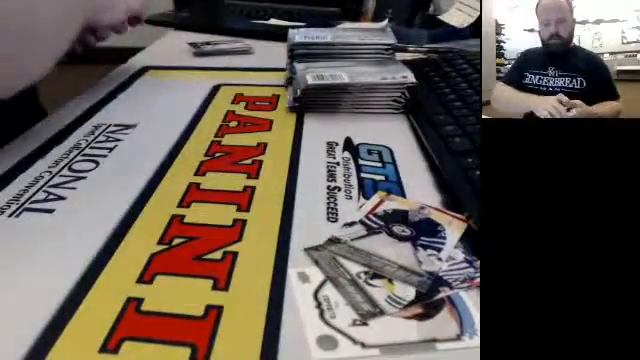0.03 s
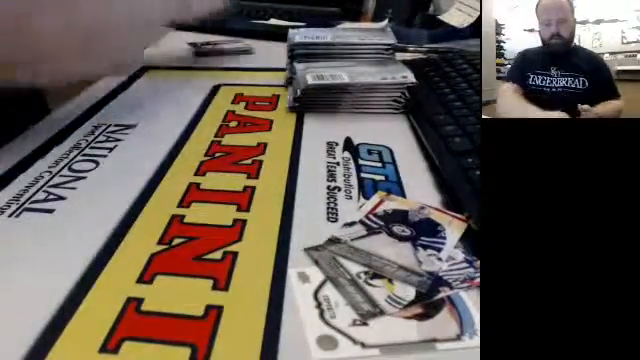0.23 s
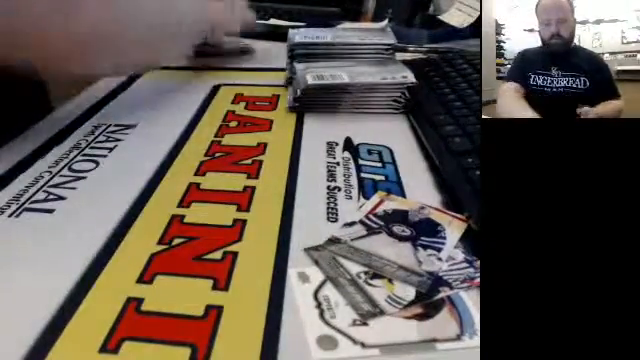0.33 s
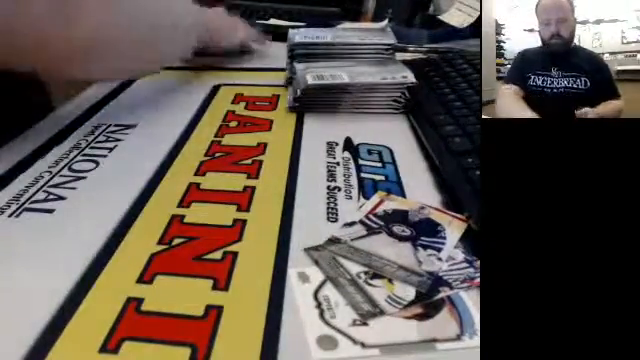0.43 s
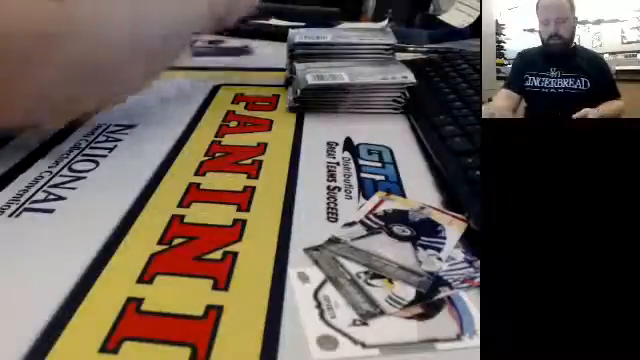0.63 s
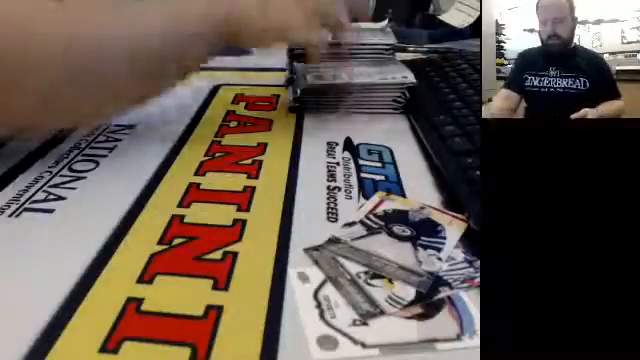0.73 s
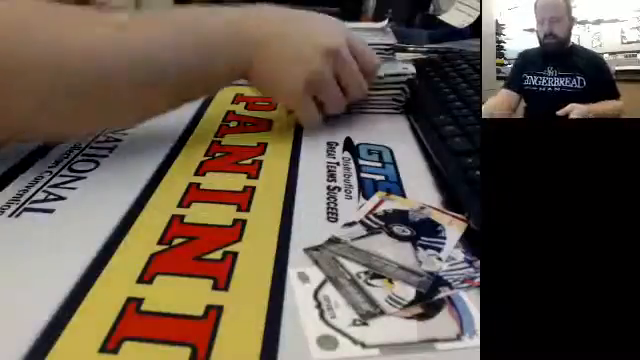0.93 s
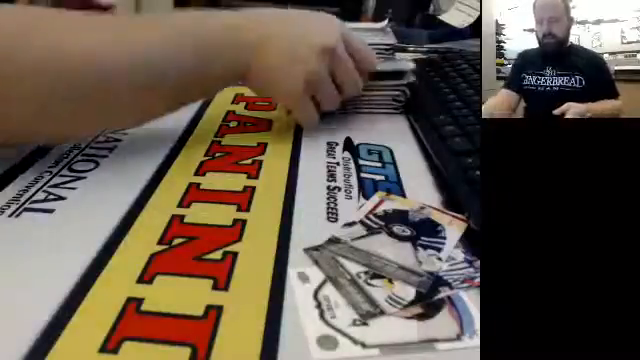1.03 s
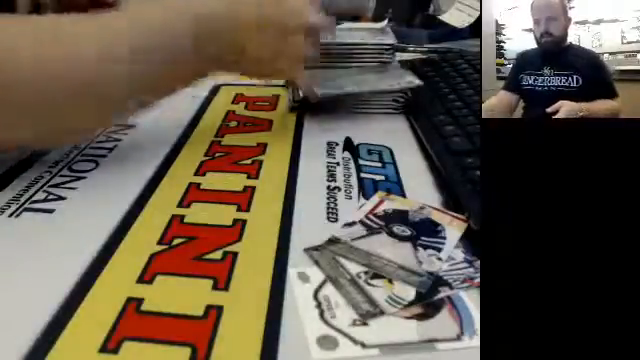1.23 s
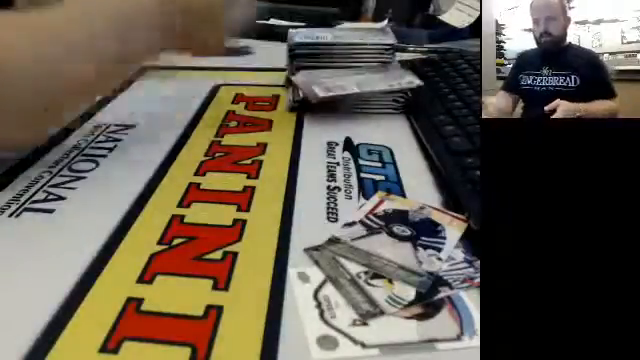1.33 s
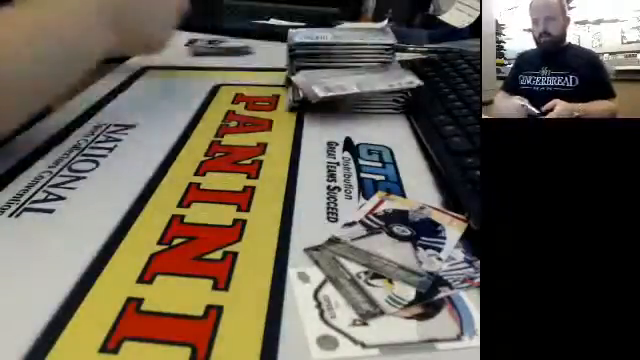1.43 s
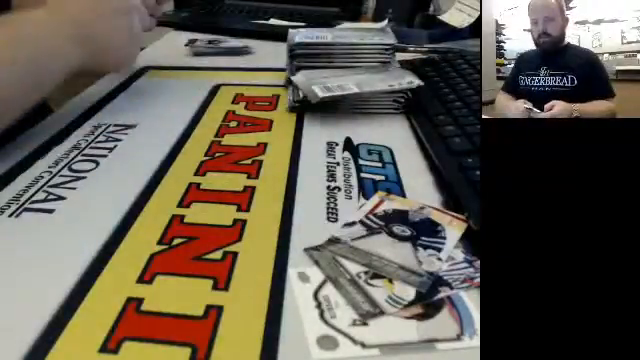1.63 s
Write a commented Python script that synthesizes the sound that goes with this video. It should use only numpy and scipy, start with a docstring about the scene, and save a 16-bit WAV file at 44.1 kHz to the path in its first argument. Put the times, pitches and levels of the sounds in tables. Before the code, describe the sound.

A hard object knocks on a tabletop before a hand takes a crinkling foil pack.

```python
"""A hard object set down on a table: one sharp knock that cracks, pings and rings the top in a small room.
Light plastic clicks come before it. Then a hand takes a foil card pack off a stack, with soft bumps:
the wrapper rustles, buckles in snaps, slides and starts to crinkle.
Mains hum and faint hiss underneath; the desk microphone is dull above 8 kHz."""
import sys
import numpy as np
from scipy import signal
from scipy.fft import rfft, irfft, next_fast_len
from scipy.io import wavfile

SR = 44100
rng = np.random.default_rng(int(sys.argv[2]) if len(sys.argv) > 2 else 0)


def waveform_to_disk(signal):
    """Save audio, clipped to [-1, 1], as 16-bit WAV at the path in sys.argv[1]."""
    frames = np.transpose(np.atleast_2d(signal))
    scaled = np.clip(frames, -1, 1) * 32767
    samples = np.round(scaled).astype(np.int16)
    wavfile.write(sys.argv[1], SR, samples)


N = 74970
T = np.arange(N) / SR
FFT_SIZE = next_fast_len(N + SR // 2, real=True) // 2 * 2
HZ = np.fft.rfftfreq(FFT_SIZE, 1 / SR)

# room noise (frequency [Hz], gain [dB])
NOISE_EQ = [(25, -16.5), (60, -9), (100, -2.5), (165, 5), (230, -5), (400, -10), (600, -13.5), (1000, -15),
            (2000, -22.5), (4000, -30.5), (8400, -34), (9500, -15), (15000, -16.5)]
# room tail (frequency [Hz], level [dB], t60 [s], start of suppression [s])
ROOM_BANDS = [(90, -12.5, .35, .3), (174, -4.5, 0.65, 0.48), (290, -2, 0.88, 0.29), (700, -11, 0.93, 0.31),
              (1500, -12.5, .62, .23), (2694, -11, 0.59, 0.25), (4840, -10.5, 0.65, .17),
              (7160, -10, 0.17, .12)]
# hand and stack bumps (time [s], level [dB], frequency [Hz], t60 [s])
BUMP_HITS = [(0.182, -53.5, 1430, 0.045), (.181, -53.5, 2255, 0.062), (0.495, -43, 259, 0.073),
             (0.656, -55, 275.9, 0.09), (1.0289, -53.5, 1338, 0.055), (1.404, -69.5, 562.6, 0.17),
             (1.509, -62.5, 690, 0.053), (1.511, -60, 1203, 0.028)]
# foil on foil (time [s], length [s], level [dB])
SLIDE_STROKES = [(0.85, 0.16, -77), (1.11, 0.046, -83), (1.39, 0.041, -77), (1.457, .14, -68.5)]
# sliding hiss (frequency [Hz], gain [dB])
SLIDE_EQ = [(1000, -32), (4500, -14), (5800, -0.5), (6800, 5.5), (7600, -4), (9000, -14)]
# rustle envelope (time [s], level [dB])
RUSTLE_ENVELOPE = [(.675, -100), (.695, -65.5), (.735, -63.5), (.775, -67), (.805, -68), (.86, -77),
                   (.95, -80.5), (1.0, -65.5), (1.045, -73), (1.075, -93.5), (1.38, -111), (1.6, -91.5),
                   (1.63, -71), (1.66, -74), (1.7, -43.5)]
# foil snaps (time [s], level [dB], facet frequency [Hz], relative facet level [dB], t60 [s])
FOIL_SNAPS = [(0.6853, -57, 6260, 3, 0.011), (0.694, -61.5, 6300, -12, 0.022),
              (0.7131, -43.5, 1882, -11, .012), (0.731, -38.5, 1930, -8.5, 0.016),
              (0.7544, -51, 3700, -6, 0.042), (.765, -64, 3600, -16, 0.017),
              (0.7875, -36.5, 4940, -16.5, 0.039), (0.7986, -42.5, 2950, -9, 0.015),
              (.834, -60.5, 5080, 2.5, 0.046), (0.876, -41, 3500, -12, .012),
              (0.934, -58.5, 3300, -6.5, 0.014), (0.976, -43.5, 2400, -1.5, 0.012),
              (1.0004, -29, 4850, -13.5, 0.0035), (1.017, -54, 6700, 0, 0.013),
              (1.0291, -40.5, 4010, -24, 0.045), (1.397, -53, 6760, 3.5, 0.038),
              (1.399, -54, 3070, -2, 0.018), (1.404, -40, 3890, -9.5, 0.026),
              (1.616, -53.5, 2600, -3, 0.03), (1.6485, -39.5, 6400, -2, 0.022),
              (1.667, -27.5, 2227, -14.5, 0.014), (1.683, -32, 1880, -14, 0.061),
              (1.6948, -30.5, 6450, 2.5, 0.0066), (1.696, -33.5, 1115, -2.5, 0.022)]
# foil timbre (frequency [Hz], gain [dB])
FOIL_EQ = [(300, -23.5), (1000, -11.5), (1550, -11.5), (2000, -3), (3200, -1.5), (5000, -3.5), (7000, 0.5),
           (8200, -10), (10000, -19)]
# plastic clicks (time [s], level [dB], relative edge level [dB])
CLICK_HITS = [(0.0488, -38.5, -1), (0.0538, -18, -16), (0.056, -24, -16), (.063, -22.5, -7.5),
              (0.067, -26, -7), (.074, -33.5, -8), (0.0817, -27, -16.5), (0.088, -35, -21.5)]
# click body (frequency [Hz], gain [dB])
PLASTIC_EQ = [(400, -32.5), (850, -20.5), (1100, -2), (1600, 3.5), (2400, -3.5), (3300, -16), (5000, -35.5),
              (8000, -49)]
# bright click edge (frequency [Hz], gain [dB])
EDGE_EQ = [(1500, -36.5), (4200, -7.5), (6000, -16), (7200, -26), (8200, -40.5)]
# edge touches, weight lands, object settles (time [s], table ring [dB], crack [dB], ping [dB])
KNOCK_HITS = [(0.2429, -30, -15, -18.5), (.2476, -2.5, 4, -26.5), (.2542, -26, -21.5, -27)]
# table top modes (frequency [Hz], level [dB], t60 [s])
TABLE_MODES = [(93.4, -36, 0.12), (223.4, -22.5, 0.07635), (374.4, -19.5, 0.13), (650.4, -16.5, 0.062),
               (854.3, -8.5, 0.032), (910, -20.5, .03), (1152, -8, 0.021), (1385, -17, .03),
               (1560, -8.5, 0.018), (2290, -30, 0.017), (2516, -24, 0.046), (2705, -27, .04)]
# contact crack (frequency [Hz], gain [dB])
CRACK_EQ = [(400, -34.5), (1000, -19.5), (1800, 1), (3000, 4), (4500, -4.5), (6000, -5), (7600, -7.5),
            (9000, -12.5)]
# direct radiation of the knock (frequency [Hz], gain [dB])
RADIATION_EQ = [(45, -38.5), (68, -31), (92, -7.5), (125, -14), (160, -21.5), (195, -4.5), (3000, 1),
                (7800, -3.5), (8600, -7), (9300, -20), (11000, -27.5)]
# knock sent into the room (frequency [Hz], gain [dB])
SPREAD_EQ = [(50, -15.5), (110, 1.5), (160, 5), (215, 22.5), (330, 22), (500, 14.5), (600, 26.5), (850, 26),
             (1050, 22.5), (1500, 20), (2050, 14), (2600, 18), (3300, 5), (5200, 2.5), (7500, -2),
             (8500, -15), (9300, -36.5)]
# microphone response (frequency [Hz], gain [dB])
MIC_EQ = [(7500, 2), (8400, -4.5), (9300, -20), (11000, -25), (15000, -22)]


def amp(db):
    """dB to gain."""
    return 10 ** (np.asarray(db) / 20)


def unit_rms(x):
    """Scale to rms 1."""
    return x / np.sqrt(np.mean(x ** 2) + 1e-20)


def log_interp(points, hz):
    """Read (frequency [Hz], value) points on a log axis."""
    points_hz, values = np.transpose(points)
    return np.interp(np.log(hz + 1), np.log(points_hz + 1), values)


def equalise(x, eq):
    """Minimum-phase filter from (frequency [Hz], gain [dB]) points."""
    cepstrum = irfft(np.log(amp(log_interp(eq, HZ))))
    cepstrum[1:FFT_SIZE // 2] *= 2
    cepstrum[FFT_SIZE // 2 + 1:] = 0
    return irfft(rfft(x, FFT_SIZE) * np.exp(rfft(cepstrum)))[:N]


def rise(start_s, attack_s):
    """Exponential onset."""
    return 1 - np.exp(-np.maximum(T - start_s, 0) / attack_s)


def decay(start_s, t60_s):
    """Exponential decay, zero before the start."""
    return (T >= start_s) * amp(-60 * np.maximum(T - start_s, 0) / t60_s)


def ring(start_s, hz, t60_s):
    """One struck mode."""
    return decay(start_s, t60_s) * np.sin(2 * np.pi * hz * (T - start_s))


def noise_band(hz, half_width_hz):
    """Cluster of close resonances: narrow noise, rms 1."""
    spectrum = rfft(rng.standard_normal(FFT_SIZE)) / (1 + ((HZ - hz) / half_width_hz) ** 4)
    return unit_rms(irfft(spectrum)[:N])


def contact(start_s, t60_s, chatter_db):
    """Impulse plus brief surface chatter."""
    x = amp(chatter_db) * decay(start_s, t60_s) * rng.standard_normal(N)
    x[min(round(start_s * SR), N - 1)] += 1
    return x


def background(hum_hz=119.8, hum_db=-65.5, noise_db=-71):
    """Mains hum and quiet room noise."""
    hum = np.sqrt(2) * np.sin(2 * np.pi * hum_hz * T)
    noise = unit_rms(equalise(rng.standard_normal(N), NOISE_EQ))
    return amp(hum_db) * hum + amp(noise_db) * noise


def room(x, build_s=0.0013, suppressor_fade_db_per_s=174.5):
    """Room tail, treble dying first; noise suppression cuts off its faint end."""
    hz, time_s, noise = signal.stft(rng.standard_normal(SR * 3 // 4), SR, nperseg=256)
    bands_hz, *columns = np.transpose(ROOM_BANDS)
    db, t60_s, knee_s = (log_interp(np.column_stack([bands_hz, c]), hz)[:, None] for c in columns)
    fall = amp(-60 * time_s / t60_s - suppressor_fade_db_per_s * np.maximum(time_s - knee_s, 0))
    build = 1 - np.exp(-time_s / build_s)
    energy_norm = np.sqrt(2 * np.log(1000) / (t60_s * SR))
    tail = signal.istft(noise * amp(db) * fall * build * energy_norm, SR, nperseg=256)[1]
    return signal.fftconvolve(x, tail)[:N]


def bumps(width_ratio=0.19, attack_s=0.004):
    """Soft contacts of hand and stack, each a short dull resonance."""
    return sum(amp(db) * noise_band(hz, width_ratio * hz) * decay(at_s, t60_s) * rise(at_s, attack_s)
               for at_s, db, hz, t60_s in BUMP_HITS)


def slides():
    """The pack slips over its neighbours: thin friction hiss."""
    envelope = np.zeros(N)
    for at_s, length_s, db in SLIDE_STROKES:
        progress = np.clip((T - at_s) / length_s, 0, 1)
        envelope += amp(db) * np.sqrt(np.abs(np.sin(np.pi * progress)))
    return envelope * unit_rms(equalise(rng.standard_normal(N), SLIDE_EQ))


def wrapper(attack_per_t60=0.018, creases_per_s=8100, crease_spread_db=4):
    """Foil buckles in snaps, each ringing its own facet, over dense tiny creases."""
    snaps = np.zeros(N)
    for at_s, db, hz, facet_db, t60_s in FOIL_SNAPS:
        facet_gain = amp(facet_db - log_interp(FOIL_EQ, hz)) / np.sqrt(2)  # offsets FOIL_EQ at hz
        facet = facet_gain * decay(at_s, t60_s) * noise_band(hz, half_width_hz=285)
        buckle = contact(at_s, t60_s, chatter_db=-4.5)
        snaps += amp(db) * (buckle + facet) * rise(at_s, attack_per_t60 * t60_s)
    triggers = rng.random(N) < creases_per_s / SR
    creases = triggers * rng.standard_normal(N) * amp(crease_spread_db * rng.standard_normal(N))
    rustle_db = np.interp(T, *np.transpose(RUSTLE_ENVELOPE))
    return equalise(snaps, FOIL_EQ) + amp(rustle_db) * unit_rms(equalise(creases, FOIL_EQ))


def clicks():
    """Light plastic rattles in the hand; some contacts have a bright edge."""
    hits = np.array([amp(db) * contact(at_s, t60_s=0.016, chatter_db=-8) for at_s, db, _ in CLICK_HITS])
    edge_gains = amp(np.array(CLICK_HITS)[:, 2])
    return equalise(hits.sum(0), PLASTIC_EQ) + equalise(edge_gains @ hits, EDGE_EQ)


def knock_spread():
    """The knock summed over all directions: broad pulses that drive the room."""
    pulses = np.zeros(N)
    for at_s, db, _, _ in KNOCK_HITS:
        pulses[round(at_s * SR)] += amp(db)
    return equalise(pulses, SPREAD_EQ)


def knock(travel_at_1khz_s=0.0003, crack_trim_db=-1):
    """Each contact cracks, pings the object and rings the table top."""
    top, crack, ping = np.zeros((3, N))
    for at_s, top_db, crack_db, ping_db in KNOCK_HITS:
        for hz, mode_db, t60_s in TABLE_MODES:
            lag_s = travel_at_1khz_s * (np.sqrt(1000 / hz) - 1)  # bending waves: low modes arrive later
            top += amp(top_db + mode_db) * ring(at_s + lag_s, hz, t60_s)
        crack += amp(crack_db + crack_trim_db) * contact(at_s, t60_s=0.016, chatter_db=-17.5)
        ping += amp(ping_db) * ring(at_s, hz=3200, t60_s=0.0018)
    return equalise(top + ping + equalise(crack, CRACK_EQ), RADIATION_EQ)


def scene(handling_send_db=-12):
    """The knock fills the room; handling stays nearly dry."""
    handling = clicks() + wrapper() + slides() + bumps()
    direct = knock() + handling
    reverb = room(knock_spread() + amp(handling_send_db) * handling)
    return (direct + reverb + background())[None]


def record(dry, peak_limit=0.7, cutoff_hz=15750):
    """Desk microphone: rounded peaks, dull top, band limit."""
    rounded = dry[0] / (1 + (dry[0] / peak_limit) ** 8) ** (1 / 8)
    dulled = equalise(rounded, MIC_EQ)
    return irfft(rfft(dulled, FFT_SIZE) * (HZ < cutoff_hz))[None, :N]


dry = scene()
out = record(dry)
waveform_to_disk(out)
```